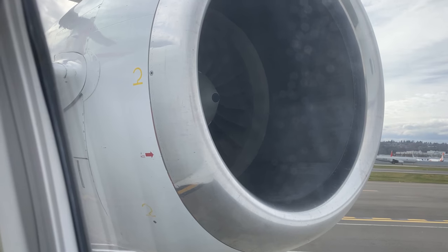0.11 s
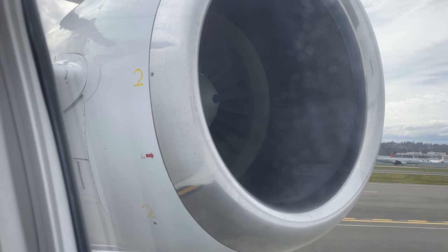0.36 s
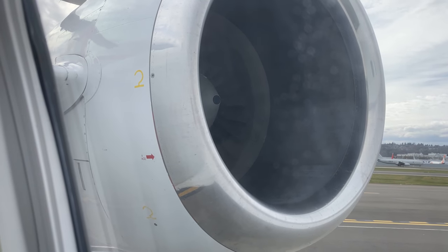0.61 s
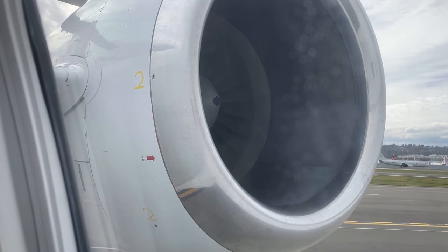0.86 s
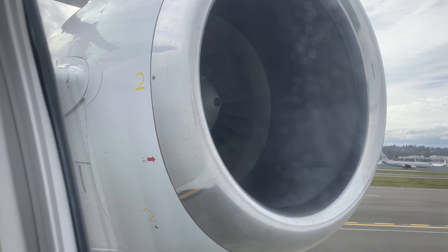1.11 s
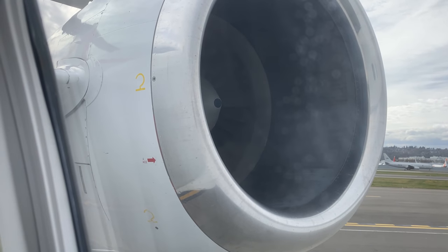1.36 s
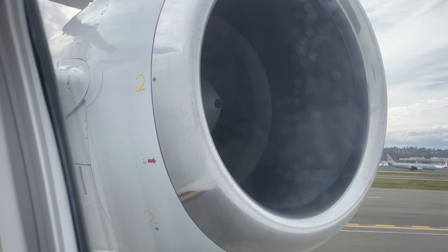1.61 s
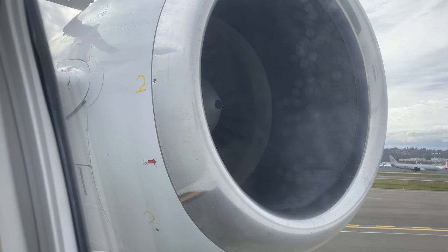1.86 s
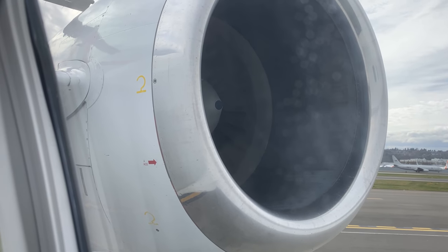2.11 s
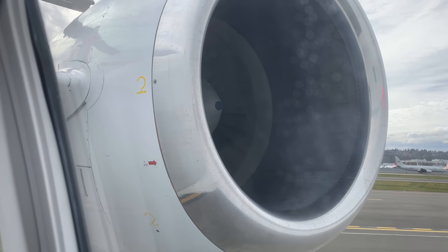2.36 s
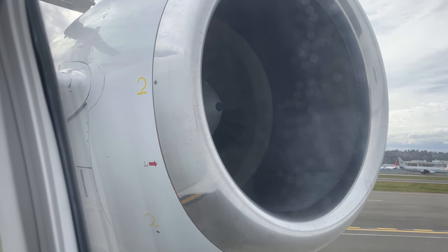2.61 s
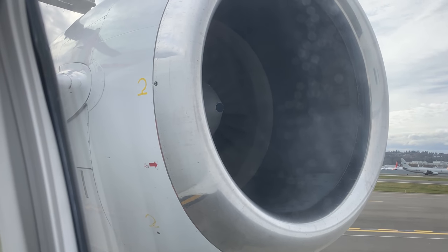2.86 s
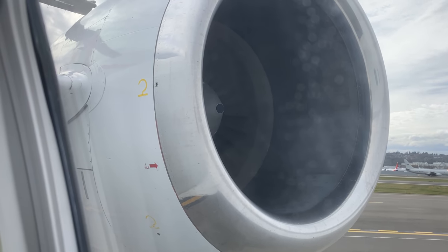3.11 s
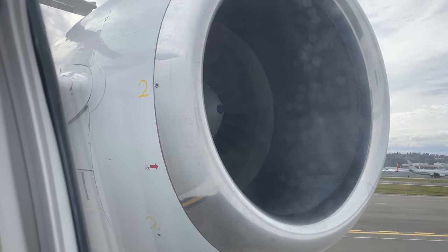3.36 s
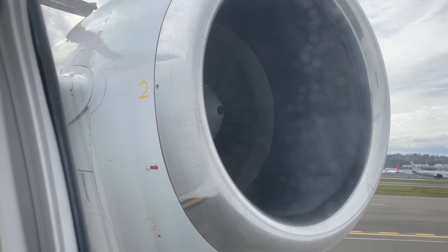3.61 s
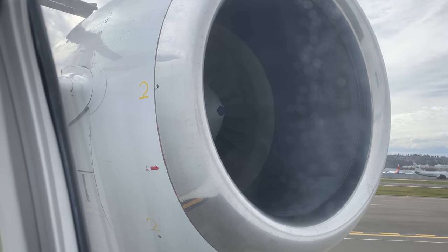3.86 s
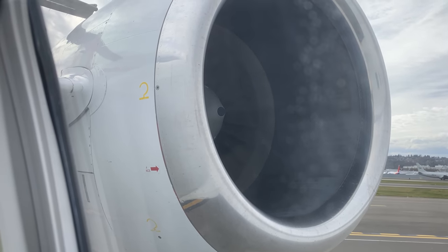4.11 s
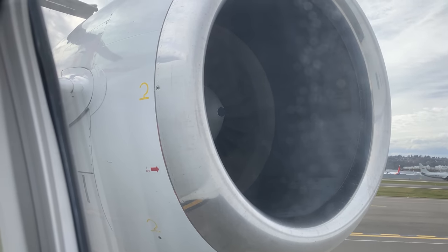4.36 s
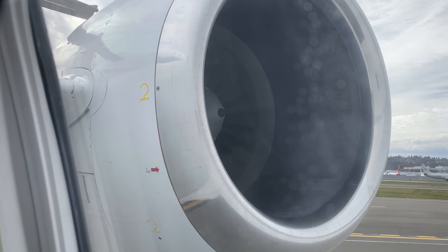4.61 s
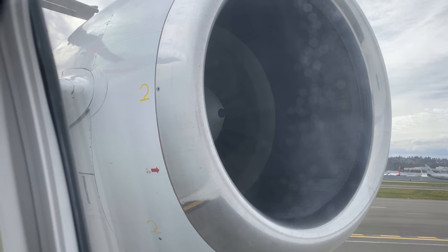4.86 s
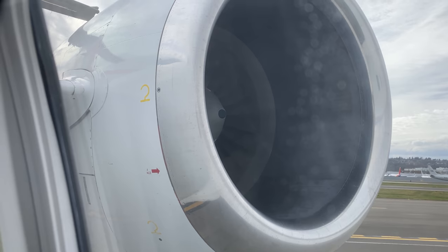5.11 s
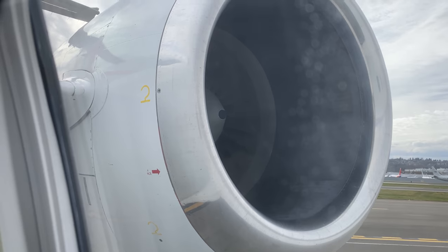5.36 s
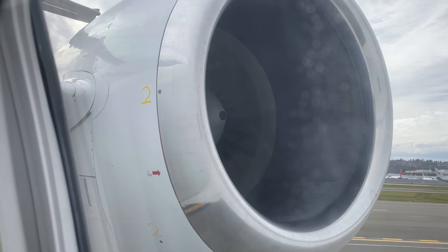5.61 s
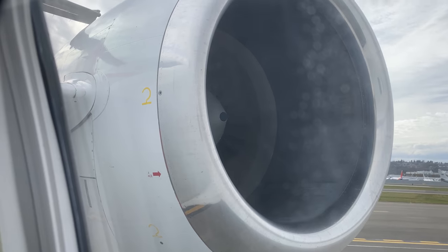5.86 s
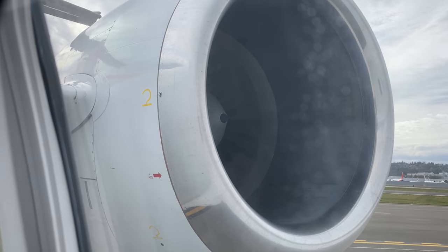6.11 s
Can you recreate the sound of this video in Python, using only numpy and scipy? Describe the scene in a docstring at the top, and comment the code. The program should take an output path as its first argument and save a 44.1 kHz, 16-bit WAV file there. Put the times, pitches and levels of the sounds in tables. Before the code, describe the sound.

Inside an aircraft cabin, a jet engine spins up with a low hum climbing in pitch over steady rumble, while another engine idles thinly.

```python
"""A starting turbofan spins up throughout, close beside the cabin, its rising shaft orders swelling in the hull.
The other engine idles with a thin whine, its steady orders sagging a little in pitch as the start draws air.
Noise shaped into rumble, rush and vent hiss fills the cabin; noise scrapes make a loose fitting's ticks,
sines make its thin ring, and a faint wavering hum sets in late. Two close microphone ports hear it."""
import sys
import numpy as np
from scipy import signal
from scipy.fft import rfft, irfft, next_fast_len
from scipy.io import wavfile
from scipy.ndimage import uniform_filter1d, map_coordinates

SR = 44100
rng = np.random.default_rng(int(sys.argv[2]) if len(sys.argv) > 2 else 0)


def gain_from_db(level_db):
    """Convert decibel levels to linear amplitude factors (20 dB per decade)."""
    decades = np.asarray(level_db, float) / 20
    return 10 ** decades


def unload_wav(signal):
    """Save mono or channel-first audio to the path in sys.argv[1] as 16-bit WAV at rate SR, clipped to [-1, 1]."""
    wavfile.write(
        sys.argv[1],
        SR,
        np.round(np.clip(np.atleast_2d(signal).T, -1, 1) * 32767).astype(np.int16),
    )


N = 274610

GEAR = 0.3025  # turns of the geared shaft per turn of the fast shaft

# cabin air at the two ports: hz, likeness (0-1), left_minus_right_db, right_leads_rad
AIR_AT_PORTS = [(40, .999, 0, 0), (100, .98, 0, .08), (160, .96, 0, .1), (250, .68, -1, .1),
                (430, .82, 2, 0), (650, .5, -1, -.5), (800, .6, -2, -1), (1250, .5, -2, -1.5),
                (1700, .72, -3, 0), (2700, .4, -1, 1.3), (3800, .4, -1, .8), (5600, .1, -8, 2),
                (7000, .45, -5, .4), (8000, .4, -2, -.9)]


def unit(x):
    """Scaled to rms 1."""
    return x / np.sqrt(np.mean(x ** 2) + 1e-20)


def along(points, hz, index=1):
    """One column of (Hz, ..) points, read on a log frequency axis."""
    table = np.transpose(points)
    return np.interp(np.log(hz + 1), np.log(table[0] + 1), table[index])


def curves(rows):
    """One value per sample for each column after the time."""
    s, *columns = np.transpose(rows)
    return [np.interp(np.arange(N) / SR, s, column) for column in columns]


def wobble(rate):
    """A smooth random curve through normal draws, rate knots a second."""
    knots = rng.standard_normal(int(N * rate / SR) + 4)
    return map_coordinates(knots, [np.arange(N) * rate / SR])


def filtered(x, response):
    """x through a complex response of frequency, padded so that its tail does not wrap."""
    m = next_fast_len(N + SR // 4)
    return irfft(rfft(x, m) * response(np.fft.rfftfreq(m, 1 / SR)), m)[..., :N]


def turns(hz):
    """Angle in radians of a shaft whose inertia smooths its speed."""
    return 2 * np.pi * np.cumsum(uniform_filter1d(hz, SR // 5)) / SR


def tone(angle, db):
    """A sine of rms level db from a random starting angle."""
    return np.sqrt(2) * gain_from_db(db) * np.sin(angle + rng.uniform(0, 2 * np.pi))


def split(pan_db, lead):
    """Complex gains of the left and right port; lead is the right port's, in radians."""
    left = gain_from_db(pan_db / 2) * np.exp(-0.5j * lead)
    right = gain_from_db(-pan_db / 2) * np.exp(0.5j * lead)
    return np.array([left, right])


def hull_db(modes, hz):
    """Level of the summed hull modes; between neighbours, equal signs cancel and opposite signs reinforce."""
    total = 0
    for centre, width, db, sign in modes:
        damping = 1j * hz * width
        total = total + np.sign(sign) * gain_from_db(db) * damping / (centre * centre - hz * hz + damping)
    return 20 * np.log10(np.abs(total))


def starting_engine():
    """Orders of both shafts rise with speed and swell through the modes; the fast shaft's set a panel buzzing."""
    # modes that carry each shaft into the cabin, its unbalance through the mounts, its overtones
    # through the hull skin: centre_hz, width_hz, peak_db, sign
    geared_mount = [(36.5, 9.5, -31, 1), (48, 5.0, -32, -1), (57.3, 6.4, -19.5, -1), (70.1, 3.5, -19, 1),
                    (76, 5.0, -25.0, -1)]
    geared_skin = [(68.8, 5.0, -18.5, 1), (78.4, 3.4, -23, -1), (88, 5.5, -26.5, 1), (98, 4.5, -16.5, -1),
                   (118.7, 21.2, -20.5, 1), (128, 5.4, -21.5, -1), (133.6, 5.2, -23.5, 1),
                   (148.3, 6.3, -39.5, 1), (206, 6.4, -21, -1), (219, 6.1, -26, 1)]
    fast_mount = [(96.6, 5.0, -24.8, 1), (113.3, 21, -29, 1), (138.2, 8, -19, 1), (151.8, 5.0, -22, 1),
                  (164.3, 8.9, -15, 1), (180.4, 4.3, -22, -1), (226.5, 40, -33.5, 1),
                  (239.3, 5.0, -36.5, -1)]
    fast_skin = [(221.1, 11, -30.5, 1), (270.5, 6.8, -30, 1), (312, 6.1, -28.5, 1), (347.7, 29, -16, 1),
                 (360.1, 15.7, -13.5, -1), (394, 25, -30, -1), (406, 14.3, -29.5, 1), (439, 46.5, -32, -1),
                 (522.3, 31.0, -43.5, -1)]
    # acceleration of the fast shaft: time_s, hz_per_s
    spin_up = [(0, 34.76), (1.06, 37.16), (6.23, 12.08)]
    # a panel shaken at resonance: buzz_order, driving_order, level_db when the drive is at buzz_at_db
    panel_buzz = [(3, 2, -49), (4, 1, -50), (4, 2, -51), (5, 1, -45), (6, 2, -53), (7, 2, -51), (8, 2, -52)]
    # standing waves of the cabin at the two ports: hz, left_minus_right_db, right_leads_rad
    cabin_waves = [(45, .2, .11), (60, -.7, .07), (75, .3, .03), (120, .4, .17), (140, .8, .07),
                   (200, -.6, .12), (215, -5.8, .27), (230, -9.1, -.11), (245, -5.6, -.4), (258, -.4, -.14),
                   (280, .1, .07), (310, 1.8, .29), (335, 1.5, .09), (400, -.4, .19), (470, 1.3, -.19),
                   (900, -1, -.8)]
    # turns per fast turn, modes met by each order from the first up, order_db,
    # growth in dB per doubling of speed, waver_db
    shafts = [(GEAR, [geared_mount, geared_skin, geared_skin], [0, 0, -6.5], 4, 1.2),
              (1, [fast_mount, fast_skin, fast_skin, fast_skin], [-0.5, 0, -1.8, -4], 4.7, 0.3)]
    start_hz, reference_hz = 91.88, 170  # fast shaft at first, and where growth is 0 dB
    buzz_at_db, buzz_growth = -18, 1.4  # the buzz grows faster than its drive, dB per dB

    hz = start_hz + np.cumsum(curves(spin_up)[0]) / SR
    angle = turns(hz)
    octaves = np.log2(hz / reference_hz)
    sound = 0
    for ratio, paths, order_db, growth_db, waver_db in shafts:
        levels = []
        for order, (modes, db) in enumerate(zip(paths, order_db), 1):
            level = db + growth_db * octaves + hull_db(modes, order * ratio * hz)
            levels.append(level)
            sound = sound + tone(order * ratio * angle, level + waver_db * wobble(9))
    # levels now holds the fast shaft's orders
    for order, driver, db in panel_buzz:
        drive_db = levels[driver - 1] - buzz_at_db
        sound = sound + tone(order * angle, db + buzz_growth * drive_db + 1.8 * wobble(7))
    return filtered(sound, lambda f: split(along(cabin_waves, f), along(cabin_waves, f, index=2)))


def idling_engine():
    """Sines for the shaft orders and a blade whine, all sagging slightly as the start draws air."""
    # speed of the fast shaft: time_s, shaft_hz
    idle_speed = [(0, 623.6), (3, 614), (3.75, 612.7), (4.8, 614.2), (6.23, 614.4)]
    # standing waves met by the whine: hz, left_db, right_db
    whine_waves = [(4903, -53, -45), (4916, -54.5, -47), (4925, -61, -50.5), (4945, -56.5, -50),
                   (4955, -58, -54), (4963, -68, -70), (4968, -71, -53), (4975, -65, -50), (4982, -63, -60),
                   (4990, -65, -61)]
    # shaft (0 fast, 1 geared), order, level_db, left_minus_right_db, right_leads_rad, waver_db
    idle_tones = [(1, 1, -26, -2, 1.11, -1.5), (1, 2, -38, 1.5, 0.23, 0.5), (1, 3, -49.5, -8, -3, 0),
                  (1, 4, -51.5, 3, 0, 4.5), (0, 1, -41.5, -2.5, 1.84, 3.5), (0, 2, -47.5, -2.5, -2.5, -0.5),
                  (0, 7, -79.5, -15.5, 5.5, 8), (0, 10, -70, -10.5, 0.5, 0.5),
                  (0, 11, -70.5, -14.5, 1.2, 3)]
    whine_order = 8

    hz, = curves(idle_speed)
    angle = turns(hz)
    whine_db = np.array([along(whine_waves, whine_order * hz, index=side) for side in (1, 2)])
    whine_angle = whine_order * angle + [[0], [0.85]]  # the right port leads, rad
    out = np.sqrt(2) * gain_from_db(whine_db + 0.35 * wobble(8.1)) * np.sin(whine_angle)
    for geared, order, db, pan_db, lead, waver_db in idle_tones:
        ratio = GEAR if geared > 0.5 else 1
        spin = np.exp(1j * (round(order) * ratio * angle + rng.uniform(0, 2 * np.pi)))
        level = gain_from_db(db + waver_db * wobble(4.13))
        out = out + np.sqrt(2) * (split(pan_db, lead)[:, None] * level * spin).imag
    return out


def air_ports(hz):
    """Port gains of the rumble, the rush and the late hum."""
    return split(along(AIR_AT_PORTS, hz, index=2), along(AIR_AT_PORTS, hz, index=3))


def sideways(hz):
    """Port gains of a sound reaching the left port first."""
    in_step_hz, turn_hz = 11050, 4700  # ports in step here; one turn out for every turn_hz away
    return split(0, 2 * np.pi * (in_step_hz - hz) / turn_hz)


def air(spectrum, patchy_db, alike, ports):
    """Stereo noise of rms 1 in random patches, through the resonances, partly alike at the ports."""
    # hull, duct and panel resonances colouring the air: centre_hz, width_hz, boost_db
    resonances = [(67.4, 12, 5.5), (93, 12.5, 7.5), (422.4, 10, 5), (508.3, 15, 6), (826, 41, 8.5),
                  (990, 30, 3), (1273, 30, 6), (1508, 21, 7.5), (1756, 30, 6.5), (2750, 34, 9),
                  (2930, 28, 7.5), (3246, 83, 4.5), (3520, 28, 6), (3750, 17, 8), (3970, 17, 4)]
    z = signal.stft(rng.standard_normal((2, N)), nperseg=512)[2]
    patches = uniform_filter1d(rng.standard_normal(z.shape[1:]), 6, 0)  # across frequency
    patches = unit(uniform_filter1d(patches, 14, 1))  # across time
    a, b = signal.istft(z * gain_from_db(patchy_db * patches), nperseg=512)[1][:, :N]

    def colour(hz):
        boost = sum(db / (1 + (2 * (hz - centre) / width) ** 2) for centre, width, db in resonances)
        return gain_from_db(along(spectrum, hz) + boost)

    def mix_angle(hz):
        return np.arccos(np.clip(alike(hz), 0, 1)) / 2

    shared = filtered(a, lambda hz: colour(hz) * ports(hz) * np.cos(mix_angle(hz)))
    opposed = filtered(b, lambda hz: colour(hz) * ports(hz) * np.sin(mix_angle(hz)) * [[1], [-1]])
    return unit(shared + opposed)


def cabin_air():
    """Rumble of the hull, rush of the ducts and fine hiss of a vent: shaped noises of slowly wavering level."""
    # spectrum shapes before resonances and scaling: hz, relative_db (per Hz)
    rumble_shape = [(15, -47), (25, -18.5), (46, -9.5), (70, -3.5), (145, -3.5), (184, -2.5), (291, -11.5),
                    (364, -12.5), (454, -18), (617, -17.5), (700, -32.5), (910, -62), (1540, -120)]
    rush_shape = [(290, -46.5), (500, -24), (613, -8.5), (1070, -10), (1240, -11), (2010, -18),
                  (2830, -23.5), (4560, -25.5), (5040, -25), (7500, -31.5), (9750, -69.5), (16500, -120)]
    hiss_shape = [(6500, -36), (8000, 2), (9500, -7), (11000, -6), (13000, -10), (15720, -8),
                  (15850, -65.5)]
    alike = lambda hz: along(AIR_AT_PORTS, hz)
    rumble = air(rumble_shape, patchy_db=0.5, alike=alike, ports=air_ports)
    rush = air(rush_shape, patchy_db=1, alike=alike, ports=air_ports)
    hiss = air(hiss_shape, patchy_db=-1.5, alike=lambda hz: 0.8 + 0 * hz, ports=sideways)
    rumble = gain_from_db(-21.5 + 0.78 * wobble(1.97)) * rumble
    rush = gain_from_db(-36 + 0.11 * wobble(2.996)) * rush
    hiss = gain_from_db(-58 + 0.4 * wobble(5.8)) * hiss
    return rumble + rush + hiss


def fitting():
    """Ticks are short broad scrapes, partly different at the ports; damped sines make one thin ring."""
    # ticks of the loose fitting: start_s, rms_db before the snap, scrape_s, centre_hz
    ticks = [(3.202, -48.5, .001, 8000), (3.208, -47, 0.0028, 10560), (3.211, -46, .002, 9016),
             (5.631, -44.5, .009, 11000), (5.632, -39, 0.0099, 6150), (5.646, -51.5, .014, 7460),
             (5.689, -53, .002, 7840), (5.786, -40.5, .0054, 10360), (5.794, -48, .001, 11000),
             (5.798, -48, .01, 12600)]
    # partials of the ring: hz, peak_db, t60_s before damping
    ring_partials = [(6450, -43, 0.12), (11000, -49, .11), (12350, -50, 0.082), (15600, -48, .6)]
    ring_start_s, ring_hold_s = 3.315, 0.045  # after the hold the ring is damped
    tick_t60 = 0.021  # s, also of the damping
    attack_s, snap, snap_s = 0.0002, 1.2, 0.0012  # each tick opens with a brief extra snap

    out = np.zeros((2, N + SR))
    t = np.arange(SR // 5) / SR
    f = np.fft.rfftfreq(len(t), 1 / SR)
    opening = (1 - np.exp(-t / attack_s)) * (1 + snap * np.exp(-t / snap_s))
    for start_s, db, scrape_s, hz in ticks:
        shared, left, right = rng.standard_normal((3, len(t)))
        noise = shared + 1.4 * np.array([left, right])
        band = 1 / (1 + (np.log(f / hz + 1e-3) / 0.33) ** 4)
        burst = unit(irfft(rfft(noise) * band, len(t)))
        fade = gain_from_db(db - 60 * np.maximum(t - scrape_s, 0) / tick_t60)
        out[:, round(start_s * SR):][:, :len(t)] += fade * opening * burst
    ring = sum(gain_from_db(db - 60 * t / t60) * np.sin(2 * np.pi * hz * t) for hz, db, t60 in ring_partials)
    damping = gain_from_db(-60 * np.maximum(t - ring_hold_s, 0) / tick_t60)
    out[:, round(ring_start_s * SR):][:, :len(t)] += ring * (1 - np.exp(-t / 0.003)) * damping
    return filtered(out[:, :N], lambda hz: hz < 15800)


def late_hum():
    """A faint sine of wavering phase and level that fades in late."""
    hum_hz, hum_db, from_s, rise_s = 860, -44.5, 4.6, 0.15
    t = np.arange(N) / SR
    hum = tone(2 * np.pi * hum_hz * t + 2.0 * wobble(9), hum_db + 2.1 * wobble(14))
    fade_in = 1 / (1 + np.exp((from_s - t) / rise_s))
    return filtered(hum * fade_in, air_ports)


def scene():
    """Both engines, the cabin air, the fitting and the late hum."""
    return starting_engine() + idling_engine() + cabin_air() + fitting() + late_hum()


def roll_off(x):
    """The treble ends steeply here."""
    return signal.sosfilt(signal.butter(12, 17070, fs=SR, output="sos"), x)


def record(dry):
    """The microphones lose the deepest bass, below about 28 Hz."""
    mix = filtered(dry, lambda hz: 1 / (1 + (28 / (hz + 1)) ** 4))
    return roll_off(mix)


dry = scene()
out = record(dry)
unload_wav(out)
```